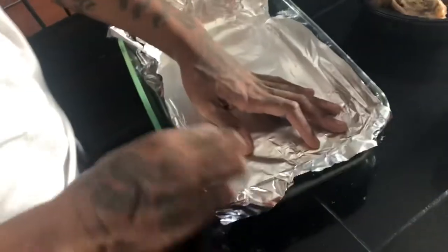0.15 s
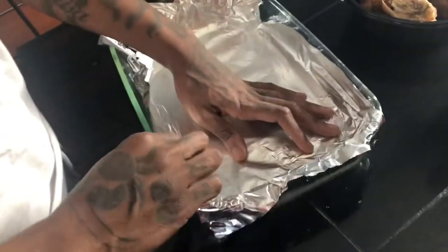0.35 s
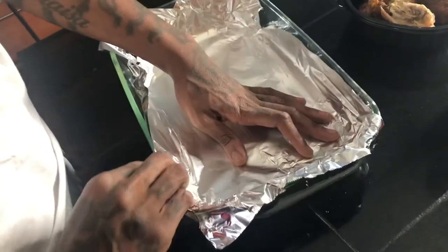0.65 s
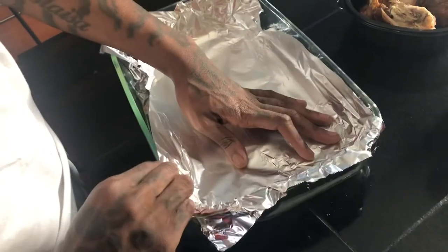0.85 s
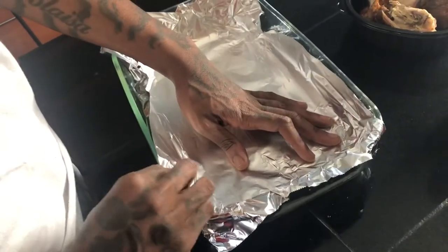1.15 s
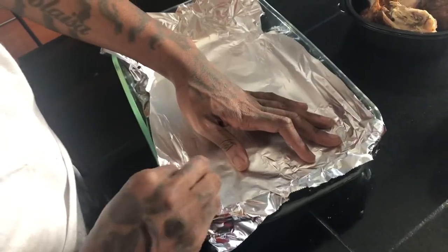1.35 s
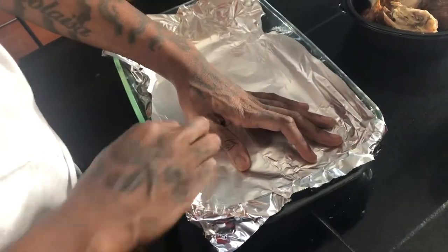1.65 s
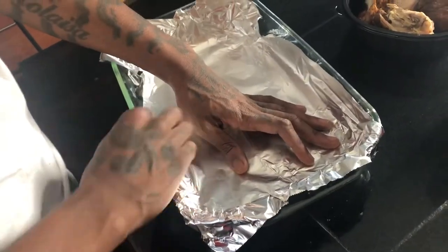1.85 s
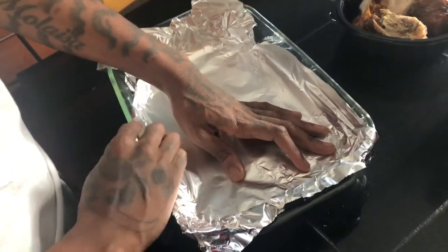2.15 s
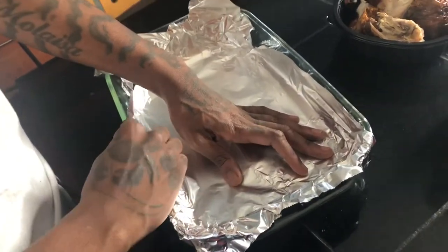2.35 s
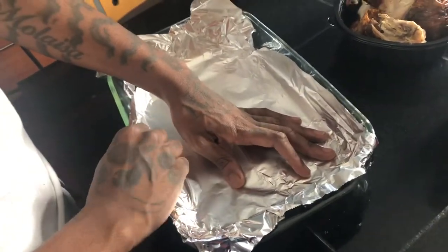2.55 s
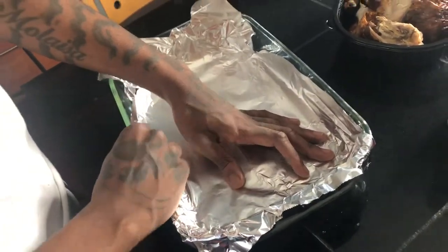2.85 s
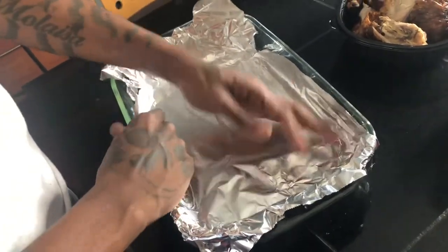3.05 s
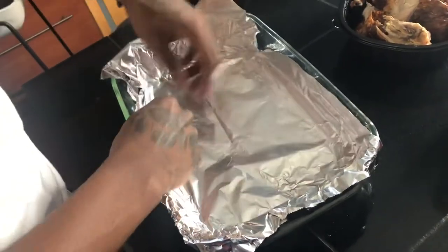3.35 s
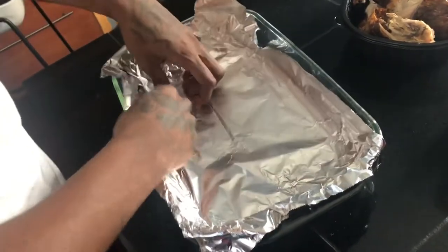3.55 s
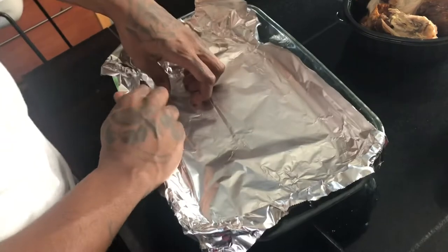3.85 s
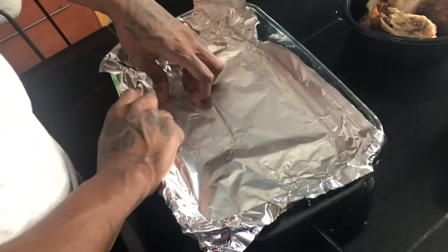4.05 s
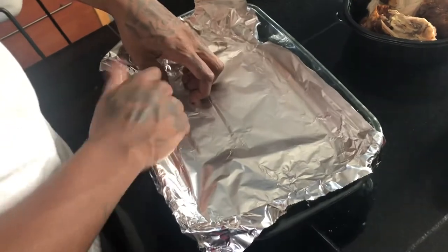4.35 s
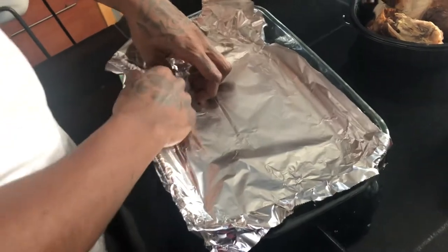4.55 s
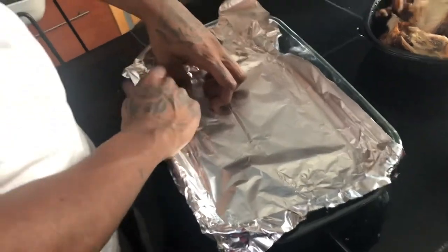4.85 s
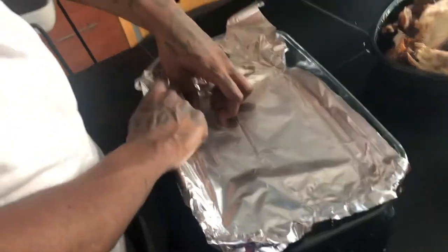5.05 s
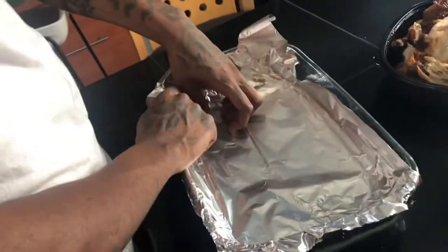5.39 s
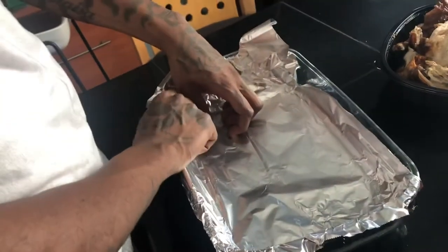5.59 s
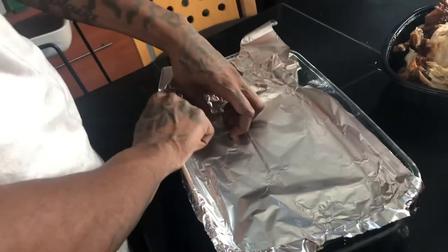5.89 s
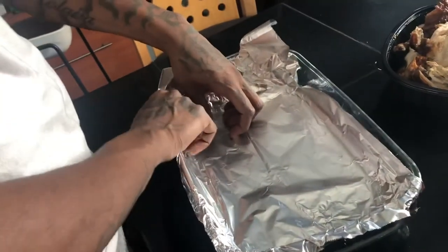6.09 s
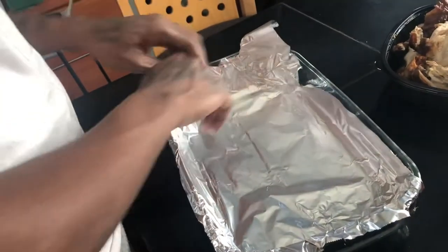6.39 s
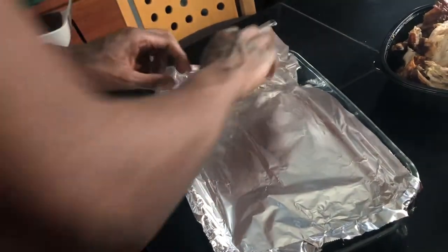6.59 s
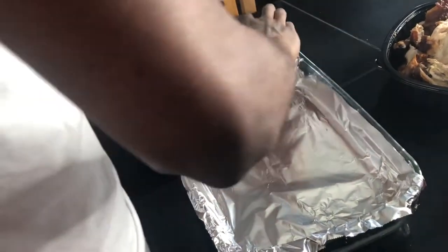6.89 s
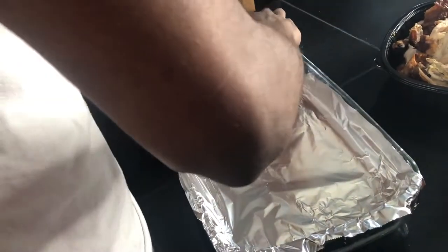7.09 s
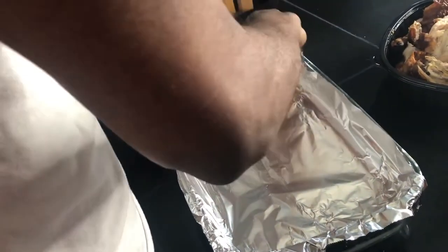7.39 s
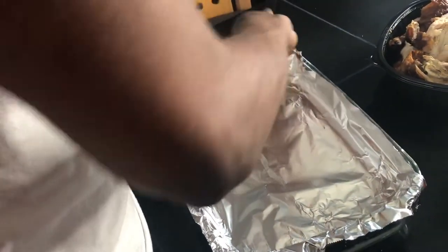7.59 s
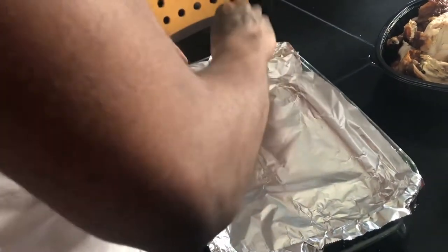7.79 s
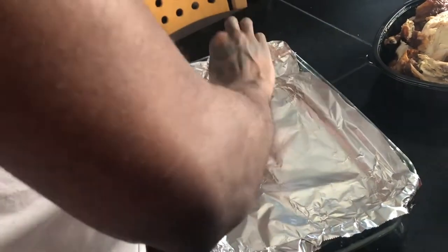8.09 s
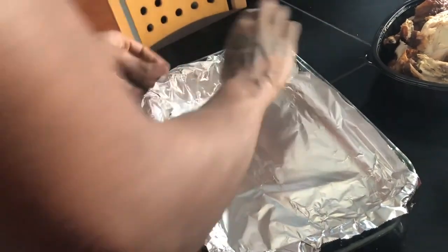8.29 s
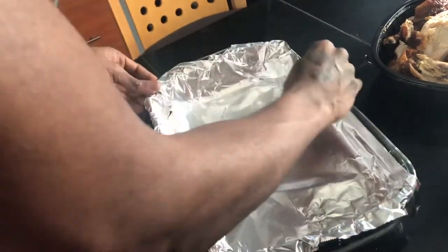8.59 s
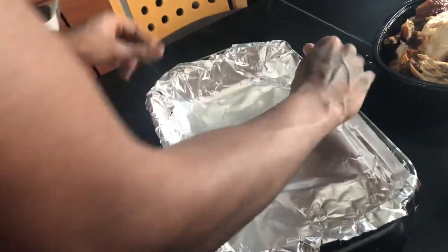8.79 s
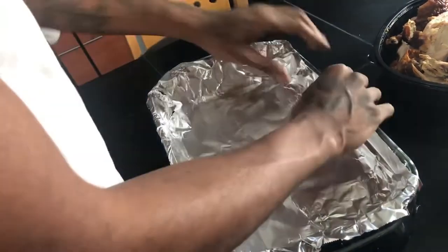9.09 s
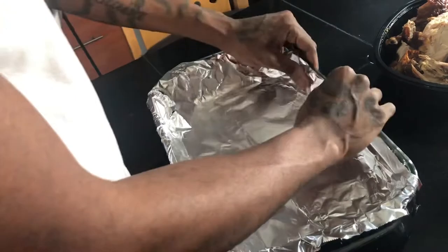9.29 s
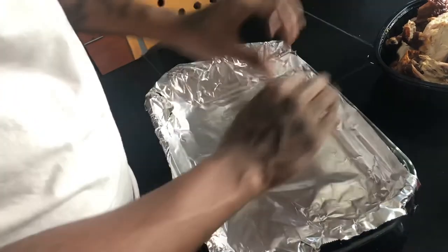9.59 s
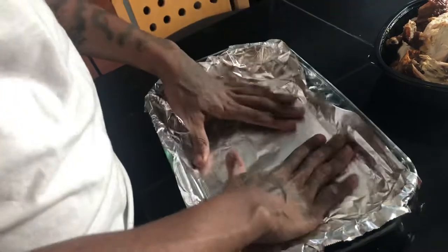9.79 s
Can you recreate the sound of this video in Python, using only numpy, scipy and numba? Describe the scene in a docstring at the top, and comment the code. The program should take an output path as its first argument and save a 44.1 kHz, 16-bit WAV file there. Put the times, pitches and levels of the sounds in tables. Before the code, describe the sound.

Aluminum foil crackles and crinkles close up as it is pressed into a glass dish, with sharp snaps, faint knocks and a quiet kitchen hum.

```python
"""Foil over a baking dish

Close on a phone at a kitchen counter: hands press and crimp aluminium foil into a glass dish.
Noise bursts make the creases, single snaps and dense showers, coloured by the dish's resonances.
The dish knocks the counter as decaying sines; foil squeaks on its rim as gliding tones.
Feedback delays echo these in the kitchen; behind lie noise rumble, a low hum of wavering sines,
and a motor of sines and growling noise that pulls in short turns."""
import sys
import numpy as np
from scipy import signal
from scipy.fft import rfft, irfft, next_fast_len
from scipy.io import wavfile
from scipy.ndimage import uniform_filter1d
from numba import njit

SR = 44100
rng = np.random.default_rng(int(sys.argv[2]) if len(sys.argv) > 2 else 0)


def int16_out(signal):
    """Quantize to a 16-bit WAV file."""
    q = np.round(np.clip(np.atleast_2d(signal).T, -1, 1) * 32767)
    wavfile.write(sys.argv[1], SR, q.astype(np.int16))


N = 438354

# Levels in the tables stand ahead of the phone's rounding and top cut.
# Room rumble, relative colour: (frequency [Hz], density [dB per Hz])
RUMBLE_COLOUR = [(22, -25.5), (35, 5), (47, -13.5), (78, 4.5), (100, -8.5), (120, -0.5), (145, -3),
                 (175, -1.5), (280, -3), (400, -5), (520, -11), (1000, -16.5), (2000, -29.5), (15000, -42)]
# Low hum lines of the room, about which they waver: (frequency [Hz], level [dB rms])
HUM_LINES = [(35, -72.5), (78, -82.5), (120, -74), (237, -75.5), (360, -71), (420, -77), (614, -75)]
# Foil noise, relative colour: (frequency [Hz], density [dB per Hz])
FOIL_COLOUR = [(240, -35), (400, -6.5), (708, -8.5), (1250, -5), (1710, -6.5), (1990, -7), (2550, -1.5),
               (3470, 4.5), (6150, 4), (14800, -0.5), (16000, -9.5)]
# Dish resonances heard under the foil: (frequency [Hz], width [Hz], gain [dB])
DISH_RESONANCES = [(1285, 240, -1.5), (1916, 330, 6.5), (2210, 290, -1.5)]
# Fingers press the sheet: (start [s], swell [s], hold [s], level [dB],
# sheen relative to it [dB], dish and sheet body relative to it [dB])
PRESSES = [(0.0, 0.0033, 0.47, -54, -6, -7.5), (0.193, .11, 0.19, -38, 1, -10),
           (0.516, 0.028, .01, -41, -4, -13), (0.605, .01, .2, -50.5, -3, -4.5),
           (0.78, 0.017, .01, -49.5, 1, -4), (0.9, .005, 0.065, -61, -2, -8),
           (0.997, 0.021, 0.045, -36.5, 3.5, -10.5), (1.16, 0.029, 0.088, -58.5, -3, -5.5),
           (1.306, 0.039, 0.0078, -51.5, -5, -5), (1.39, .005, 0.17, -51.5, -5, -10),
           (1.504, 0.023, 0.013, -45, -1, -9), (1.584, 0.012, .1, -61, 1.5, -3),
           (1.766, 0.039, 0.19, -42, -1, -7.5), (1.942, 0.038, 0.0063, -36, 3, -15),
           (2.05, 0.011, 0.69, -56.5, -3, -7), (2.097, 0.015, .01, -42.5, 6.5, -4),
           (2.173, 0.026, 0.1, -48.5, -6, -5), (2.392, 0.027, .03, -49, -2, 2),
           (2.315, .006, .005, -50.5, 4, -7.5), (2.43, .01, .005, -55, -2, -3),
           (2.458, 0.042, 0.008, -38, 4, -7), (2.672, .005, .015, -52, 0, -7.5),
           (2.776, .005, .02, -58.5, -6.5, -2.5), (2.68, 0.015, 0.015, -53, -6, -1.5),
           (2.826, 0.051, 0.11, -32, 4, -11.5), (3.355, 0.012, 0.045, -29.5, 7, -8),
           (3.451, 0.037, 0.055, -33, 4.5, -7), (3.548, .01, 0.053, -42, 2.5, -10),
           (3.619, 0.099, 0.037, -38, 3.5, -8), (3.884, 0.009, 0.089, -48.5, -3, -5),
           (3.955, 0.068, 0.0067, -35.5, 3, -5), (4.092, 0.1, 0.017, -42, 4, -7.5),
           (4.349, .15, 0.029, -37.5, 3.5, -7), (4.64, 0.061, 0.013, -39, -1, -8),
           (4.761, .1, 0.013, -34.5, 4, -6.5), (4.91, .01, 0.027, -46.5, -3, -8),
           (5.011, 0.065, .01, -41, -2, -8.5), (5.235, 0.1, 0.059, -39.5, -2, -5.5),
           (5.42, 0.014, .005, -46, -1, -10), (5.567, 0.0097, .005, -50.5, -4, -4.5),
           (5.503, .02, 0.089, -66, -6, -5), (5.73, 0.048, 0.09, -40, -3.5, -5),
           (5.9, .02, 0.055, -55, -4, -12), (6.036, 0.062, 0.0078, -35, 1.5, -9.5),
           (6.135, .01, 0.038, -41.5, -1, -7), (6.576, .005, 0.055, -45.5, 1, -1.5),
           (6.597, 0.065, 0.068, -38, -1, -4), (6.774, 0.016, 0.21, -45, -5, -6),
           (7.037, 0.14, .01, -40.5, -6, -6), (7.236, 0.033, .005, -37, -2, -5.5),
           (7.307, .01, 0.12, -45.5, -6, -5.5), (7.464, 0.13, 0.0059, -39, -6.5, -8),
           (7.753, 0.034, 0.062, -40.5, -4.5, -9.5), (7.86, 0.013, 0.18, -52, -3, -2),
           (8.012, 0.14, .02, -42, -3, -10.5), (8.213, 0.021, 0.01, -41, 1.5, -11.5),
           (8.412, 0.011, 0.025, -36.5, -2.5, -9), (8.452, 0.038, 0.019, -34, 5.5, -9.5),
           (8.576, .02, 0.067, -45.5, 0, -9.5), (8.637, 0.087, 0.0075, -41, 1, -9),
           (9.117, 0.01, 0.062, -35.5, 4, -7), (9.274, 0.16, 0.017, -34, 3, -10.5),
           (9.595, 0.0043, 0.0089, -53, -10, -15), (9.668, 0.015, 0.044, -25.5, 8, -12.5),
           (9.686, 0.031, 0.032, -26, 7.5, -10), (9.831, 0.11, .02, -33, 9.5, -9)]
# Single creases: (time [s], nominal peak [dB], facet ring [Hz], sheen rms relative to peak [dB],
# body rms relative to peak [dB], body ring [Hz], t60 [s], ringing share [0-1])
SNAPS = [(0.0374, -31.5, 5670, -4, -24, 2150, 0.037, 0), (0.0608, -31, 6360, -8, -20, 2360, 0.042, 0),
         (0.1168, -35, 5720, -5, -32, 2290, 0.08, 0.25), (0.185, -35, 6610, -4.5, -32, 2400, 0.06, 0.25),
         (0.2402, -34, 4840, -5, -11.5, 2340, 0.06, 0.1), (0.2893, -34, 4380, -11, -25, 2500, 0.054, 0.25),
         (0.3441, -19.5, 5400, -3.5, -21, 2420, 0.081, 0.06),
         (0.4011, -22, 3580, -4, -22, 2500, 0.065, 0.2), (0.401, -21, 4540, -8, -28, 2210, 0.06, 0.25),
         (0.4405, -30, 6930, -10, -31, 2180, 0.053, 0.25), (0.4529, -17, 6350, -5, -25, 1810, 0.13, 0.25),
         (0.5255, -13.5, 6000, -14, -36, 2400, 0.06, 0.25), (0.556, -20.5, 5270, -8, -25, 1850, 0.06, 0.4),
         (0.6309, -17.5, 4020, -10.5, -26, 1840, 0.068, 0.2),
         (0.6733, -28.5, 4900, -16, -16, 1180, 0.039, 0.5), (0.764, -32, 3500, -13, -20, 2020, 0.044, 0.25),
         (0.794, -25, 6080, -13, -21, 2300, 0.065, 0), (0.8169, -22, 5580, -12, -21.5, 1710, 0.063, 0),
         (0.8833, -37.5, 6400, -4.5, -31, 2500, 0.089, 0.4),
         (0.9667, -33.5, 3520, -18, -7, 1970, 0.11, 0.12), (1.0083, -25.5, 3980, -12, -24, 2390, 0.06, 0.2),
         (1.0203, -19.5, 6540, -7.5, -25, 2290, 0.11, 0.1), (1.396, -24, 2930, -18, -15, 2490, 0.06, 0.2),
         (1.443, -18.5, 4010, -7, -24, 1920, 0.06, 0.2), (1.482, -31, 4820, -12, -19, 2480, 0.06, 0.25),
         (1.5178, -26, 2800, -8, -17, 1650, 0.048, 0), (1.5188, -16.5, 4290, -22, -17.5, 2300, 0.06, 0.12),
         (1.786, -40, 5010, -10, -7, 1870, 0.06, 0.25), (1.7955, -30, 4390, -14, -14, 2090, 0.055, 0.2),
         (1.8, -21.5, 6870, -5, -18, 2360, 0.18, 0), (1.873, -25, 6290, -7, -33, 1830, 0.06, 0.5),
         (1.8876, -21, 4170, -6, -23, 1840, 0.06, 0.25), (1.9155, -26.5, 5790, -11, -24, 1710, 0.041, 0.25),
         (1.9453, -18.5, 6970, -7, -22.5, 1840, 0.12, 0),
         (1.9991, -17.5, 6700, -4.5, -22, 1760, 0.082, 0.1),
         (2.1187, -19, 5100, -7.5, -31, 2500, 0.088, 0.35),
         (2.1408, -26.5, 3530, -1, -24, 1210, 0.037, 0.25),
         (2.2222, -24.5, 4860, -9, -21, 1900, 0.075, 0.3),
         (2.2857, -22.5, 6310, -8.5, -18.5, 2440, 0.063, 0.4),
         (2.365, -38, 7000, -7, -18, 964, 0.039, 0.25), (2.381, -21.5, 2920, -23, -22, 2520, 0.053, 0.6),
         (2.4108, -29, 5740, -10, -8, 1270, 0.077, 0.6), (2.4666, -28.5, 5100, -11, -21, 1820, 0.036, 0.25),
         (2.4904, -22, 5060, -11, -24, 2330, 0.12, 0), (2.5381, -23, 3450, -6.5, -22, 2200, 0.028, 0),
         (2.5815, -21.5, 5200, -17, -27, 2310, 0.033, 0.7),
         (2.617, -21.5, 5200, -14, -23.5, 2250, 0.031, 0.15),
         (2.7055, -21.5, 4170, -12, -27, 1360, 0.075, 0.2),
         (2.818, -32.5, 5890, -8.5, -21, 2500, 0.06, 0.25), (2.837, -27.5, 3520, -7, -18, 1520, 0.065, 0.5),
         (2.8629, -19, 5730, -7, -28, 1860, 0.13, 0.25), (2.9267, -21, 5390, -10, -31, 2160, 0.06, 0.25),
         (2.9392, -17, 6080, -6, -27, 2250, 0.06, 0.25), (3.006, -23, 3930, -6, -26, 2320, 0.06, 0),
         (3.365, -16, 5190, -10, -27.5, 2040, 0.06, 0.4), (3.3725, -12.5, 7000, -3.5, -28, 2300, 0.07, 0.5),
         (3.465, -19.5, 3470, -7, -21, 2200, 0.077, 0.25), (3.5117, -14, 6840, -16, -23, 2020, 0.047, 0.4),
         (3.6301, -22, 6900, -5, -18.5, 1920, 0.06, 0.3), (3.6561, -22, 6790, -21, -34, 1700, 0.051, 0.25),
         (3.6748, -27, 5050, -6, -20.5, 1710, 0.06, 0.25), (3.693, -22, 6020, -9, -24, 1910, 0.06, 0.07),
         (3.7958, -25, 5650, -7, -22.5, 1940, 0.06, 0.3), (3.832, -31, 6520, -11, -19, 1270, 0.043, 0.4),
         (3.857, -29.5, 6840, -9, -18.5, 1930, 0.06, 0.2), (3.912, -28, 5350, -10, -21, 2300, 0.06, 0.1),
         (3.9175, -27, 5110, -15, -24, 1840, 0.066, 0.1),
         (3.9517, -26.5, 3370, -11.5, -24, 1910, 0.11, 0.03),
         (4.0136, -15.5, 6140, -12, -27, 2190, 0.048, 0.3), (4.0226, -16, 4230, -9, -32, 1910, 0.06, 0.25),
         (4.0304, -15.5, 7000, -8, -20, 1340, 0.087, 0.4), (4.1074, -28.5, 7000, -11, -22, 851, 0.096, 0.3),
         (4.1572, -24.5, 6140, -7, -28, 2030, 0.052, 0.25), (4.2013, -30, 6150, -7, -27, 2210, 0.082, 0.25),
         (4.2772, -32, 3340, -18, -18.5, 2120, 0.093, 0.2), (4.372, -32, 6020, -11, -21, 2130, 0.039, 0.1),
         (4.4306, -25, 6300, -7, -29, 2500, 0.05, 0.4), (4.4498, -19.5, 5980, -9, -26, 2100, 0.17, 0.25),
         (4.5037, -15, 6360, -4.5, -19, 1280, 0.076, 0.2), (4.536, -23, 5660, -18, -16, 2030, 0.036, 0.25),
         (4.5805, -25, 5530, -5, -18.5, 2250, 0.065, 0.25), (4.592, -20, 4990, -10, -23, 2050, 0.1, 0.1),
         (4.6548, -19.5, 6090, -11, -26.5, 2060, 0.043, 0.5),
         (4.6813, -18.5, 6950, -11.5, -30, 1340, 0.06, 0.1),
         (4.6946, -21.5, 5880, -8, -24, 1830, 0.094, 0.25), (4.763, -27.5, 4370, -9, -28, 2230, 0.06, 0.25),
         (4.7792, -21.5, 3550, -8, -20, 2200, 0.092, 0.2),
         (4.8045, -19, 5630, -10, -12.5, 2040, 0.058, 0.3), (4.84, -25, 6410, -11, -17, 2030, 0.06, 0.2),
         (4.8518, -8.5, 5460, -10.5, -19, 2040, 0.085, 0.07),
         (4.9257, -27, 5590, -9, -22, 2080, 0.049, 0.25), (4.9396, -19, 3060, -8.5, -21, 1400, 0.047, 0.2),
         (5.018, -25.5, 4220, -13, -34, 1840, 0.041, 0.6), (5.0618, -22, 4110, -9, -25, 2100, 0.065, 0.25),
         (5.0932, -21.5, 6360, -10, -16.5, 1170, 0.06, 0.1),
         (5.1876, -33, 5190, -21, -22, 2500, 0.091, 0.25), (5.25, -32.5, 4240, -9, -19, 2180, 0.076, 0.25),
         (5.3238, -21, 3690, -11, -8.5, 1970, 0.049, 0.97),
         (5.3316, -19, 6960, -11.5, -27, 1160, 0.045, 0.25),
         (5.353, -15, 5720, -10.5, -20, 2190, 0.047, 0.4),
         (5.4897, -26.5, 5690, -16, -14.5, 2140, 0.04, 0.75),
         (5.5588, -35, 3400, -15, -17, 2080, 0.095, 0.25), (5.659, -31, 4200, -29, -30, 2080, 0.06, 0.1),
         (5.7024, -33.5, 4300, -21, -30, 877, 0.06, 0.25), (5.7234, -38.5, 5700, -6, -25, 2230, 0.05, 0.3),
         (5.7517, -35, 6500, -16.5, -15, 1040, 0.06, 0.25),
         (5.7663, -23, 3600, -16, -14, 1050, 0.075, 0.17), (5.774, -21.5, 3700, -14, -16, 1920, 0.1, 0.1),
         (5.8513, -27, 4170, -21, -9, 2030, 0.06, 0.25), (5.8738, -25.5, 4300, -8.5, -11, 1900, 0.06, 0.5),
         (5.9794, -22.5, 4270, -12.5, -17.5, 1340, 0.079, 0.4),
         (6.0368, -24.5, 5200, -17, -16.5, 2130, 0.051, 0.45),
         (6.0661, -37, 5600, -17, -24, 2040, 0.049, 0.25), (6.0834, -17, 5040, -9, -21, 2100, 0.085, 0.03),
         (6.1085, -15.5, 5000, -2.5, -20.5, 2210, 0.073, 0.13),
         (6.1644, -28.5, 5950, -1.5, -21, 2200, 0.097, 0.25),
         (6.352, -39.5, 6530, -23, -30.5, 1010, 0.036, 0), (6.576, -38, 3180, -11, -14, 1890, 0.053, 0.25),
         (6.5959, -29, 3010, -13, -13, 864, 0.067, 0.3), (6.6363, -24.5, 3100, -12, -15, 1680, 0.065, 0.2),
         (6.6692, -19.5, 3980, -6.5, -17, 2010, 0.13, 0.1), (6.6984, -20, 2890, -7, -15, 1240, 0.049, 0.6),
         (6.7367, -21, 4130, -8, -21, 1670, 0.06, 0.25), (6.764, -18.5, 3680, -7.5, -38, 2170, 0.099, 0.25),
         (6.8587, -28.5, 3840, -14, -17, 1940, 0.14, 0.4),
         (6.8825, -26.5, 5820, -11, -12.5, 1710, 0.07, 0.2),
         (6.9084, -25.5, 5950, -12, -8.5, 1810, 0.086, 0.5),
         (6.9294, -24.5, 5610, -7, -12.5, 2010, 0.05, 0.05),
         (6.9985, -37, 6470, -14, -19, 1710, 0.066, 0.1), (6.999, -21, 5660, -19, -20.5, 2440, 0.044, 0.46),
         (7.0806, -24, 5750, -16, -20, 2070, 0.049, 0.14), (7.1257, -25, 6860, -13.5, -20, 1900, 0.027, 0),
         (7.1924, -26, 4720, -8, -28, 2490, 0.046, 0.3), (7.2424, -24.5, 5790, -11, -19, 2160, 0.081, 0),
         (7.3387, -24.5, 4910, -23, -12, 2500, 0.041, 0.6),
         (7.3492, -21, 6430, -13, -17, 1850, 0.065, 0.15),
         (7.392, -18.5, 2800, -20, -19.5, 2380, 0.065, 0.84),
         (7.4128, -18, 3260, -19, -28, 2040, 0.046, 0.3),
         (7.4242, -18, 6500, -15, -22.5, 2480, 0.048, 0.07), (7.546, -25.5, 3910, -16, -18, 2340, 0.053, 0),
         (7.7586, -47, 5910, -12, -9, 1740, 0.068, 0.25), (7.7842, -26.5, 5660, -8.5, -18, 2230, 0.11, 0.1),
         (7.9443, -20, 5160, -15, -24, 2174, 0.04, 0.34),
         (8.0586, -13, 5200, -18, -24.5, 2200, 0.033, 0.54),
         (8.086, -22.5, 4840, -31, -36, 2170, 0.066, 0.6),
         (8.1504, -25, 5630, -9.5, -23, 2300, 0.075, 0.25), (8.233, -24, 4440, -17, -22.5, 2200, 0.15, 0.3),
         (8.418, -29, 4690, -16, -23, 2500, 0.06, 0.25), (8.4619, -20, 4480, -11, -26, 1850, 0.054, 0.4),
         (8.4814, -18, 4990, -10, -28, 2370, 0.076, 0.4), (8.5965, -31, 4170, -18, -19, 2080, 0.06, 0.1),
         (8.6092, -24, 4200, -8, -22, 2240, 0.06, 0.25), (8.6936, -29, 7000, -8, -32, 2260, 0.06, 0.25),
         (8.694, -25, 4660, -8, -34, 2220, 0.06, 0.4), (8.7083, -22, 4760, -11, -37, 1830, 0.06, 0.8),
         (8.739, -18, 5140, -8.5, -25.5, 2140, 0.088, 0.03),
         (9.1299, -19, 4300, -10.5, -15, 2490, 0.05, 0.01), (9.2685, -25, 5270, -10, -23, 2040, 0.075, 0),
         (9.2852, -20, 4440, -13, -16, 1240, 0.038, 0.25), (9.3197, -21.5, 4100, -10, -26, 1100, 0.051, 0),
         (9.3621, -32, 4650, -18, -15, 851, 0.05, 0.25), (9.3806, -26.5, 5550, 1, -24, 2420, 0.071, 0.25),
         (9.412, -18.5, 6270, -5.5, -23.5, 2290, 0.18, 0.3),
         (9.5457, -31, 5340, -9, -26, 1880, 0.085, 0.25), (9.6035, -31.5, 6560, -14, -35, 2450, 0.1, 0.6),
         (9.6759, -15, 5946, -8, -29, 2500, 0.065, 0.5), (9.6877, -11, 4810, -17, -28, 2450, 0.069, 0.5),
         (9.869, -27.5, 5120, -3, -25, 1790, 0.065, 0.25), (9.8945, -25, 5240, -4, -23, 2090, 0.045, 0.25),
         (9.9112, -23, 4010, -2, -26, 2050, 0.077, 0)]
# When the motor pulls: (start [s], end [s], strength [dB])
MOTOR_TURNS = [(1.454, 2.35, -0.5), (4.8, 5.75, 0.5), (8.098, 9.095, -0.5)]
# Motor lines at 0 dB strength, about which they waver: (frequency [Hz], level [dB rms])
MOTOR_LINES = [(120, -72), (240, -73), (301, -69), (345, -73), (362, -73), (420, -71)]
# Dish on the counter: (time [s], peak [dB], ring length [factor on t60], brightness [dB per octave])
KNOCKS = [(1.519, -36, 0.6, 0.5), (3.398, -33.5, 0.9, 1), (4.059, -18, 0.74, 1.5), (4.849, -29, 0.4, 8),
          (6.596, -25.5, 0.09, 8.5), (6.654, -32.5, 0.9, 1), (6.699, -19.5, 0.03, 12),
          (6.728, -28, 0.08, 9), (8.442, -35, 0.4, 8), (9.131, -47, 0.4, 6), (9.286, -34, 0.8, 1),
          (9.731, -35.5, 0.5, -0.5)]
# Modes of dish and counter: (frequency [Hz], relative level [dB], t60 at ring length 1 [s])
COUNTER_MODES = [(169.6, -8, 0.72), (182, -12.5, 0.96), (290, -5, .2), (372, -2, 0.22), (470, 3.5, 0.065),
                 (536.5, -4.5, 0.34), (694, -3.5, 0.11), (782, -9.5, 0.16), (898, 3.5, 0.08),
                 (1226, -1.5, 0.048), (1496, -1.5, 0.052), (1840, -17, 0.027)]
# A tight flap of foil on the rim: (start [s], end [s], pitch [Hz], end pitch [Hz], level [dB rms])
SQUEAKS = [(2.2, 2.234, 1197, 1150, -50), (2.355, 2.41, 980, 1030, -62), (5.31, 5.372, 1133, 1180, -47),
           (7.29, 7.361, 870, 930, -51.5), (9.31, 9.397, 860, 873, -50.5)]

RUMBLE_DB = -57.5
SWELL_DB, RELEASE_DB_PER_S = 14, 227.5  # a press swells by this much, then dies away
SHEEN_PER_DB, BODY_PER_DB = 0.6, -0.2  # extra loss per dB below full strength: duller, more body
REST_DB = -89  # the sheet left alone
FACET_Q = 11.0  # sharpness of a facet's ring
GRAIN_T60_S = 0.02  # middle length of the small creases
FEWEST = 0.2  # least share of the small creases that sound
CREST_DB = 13  # peak of a crease over its rms
HARD_T60_S = 0.06  # creases shorter than this start with a harder crack
ROOM_T60_S, ROOM_DAMP, ROOM_DB = 0.58, 0.47, -19.5  # t60 before damping, damping [0-1], gain
TOP_HZ = 15900


def undb(db):
    """Decibels to an amplitude factor."""
    return 10 ** (np.asarray(db) / 20)


def level(x, db):
    """Sets the rms of a signal in dB."""
    return x * undb(db) / np.sqrt(np.mean(x ** 2))


def noise(spectrum, lo_hz=1, hi_hz=22000):
    """Noise of a (Hz, dB) colour between two edges, rms 1."""
    n = next_fast_len(N, True)
    f = np.arange(1, n // 2 + 2) * SR / n
    hz, db = np.transpose(spectrum)
    colour = undb(np.interp(np.log(f), np.log(hz), db))
    edges = np.sqrt((1 + (lo_hz / f) ** 8) * (1 + (f / hi_hz) ** 8))
    return level(irfft(rfft(rng.standard_normal(n)) * colour / edges, n)[:N], 0)


def ring(x, hz, width):
    """One resonance, gain 1 at its centre."""
    return signal.lfilter(*signal.iirpeak(hz, hz / width, fs=SR), x)


def walk(rate):
    """Random levels held 1 / rate s and slewed twice; spread near 1."""
    k = int(SR / rate)
    steps = np.repeat(rng.standard_normal(N // k + 1), k)
    return 1.45 * uniform_filter1d(uniform_filter1d(steps, k), k)[:N]


def tones(lines, waver_db, drift):
    """Sine lines whose strength [dB] and phase [cycles] waver by about the given spreads."""
    t = np.arange(N) / SR
    out = np.zeros(N)
    for hz, db in lines:
        strength = np.sqrt(2) * undb(db + waver_db * walk(15))
        cycles = hz * t + rng.random() + drift * walk(12)
        out += strength * np.sin(2 * np.pi * cycles)
    return out


def rumble():
    """Room rumble: coloured noise whose level wanders slowly."""
    return level(noise(RUMBLE_COLOUR), RUMBLE_DB) * undb(1.0 * walk(3.17))


def hum():
    """Room hum: low lines with a slight waver."""
    return tones(HUM_LINES, waver_db=1.0, drift=0.05)


def foil_bands():
    """Body (coloured by the dish), middle and sheen of the sheet's sound, each at rms 1."""
    body = noise(FOIL_COLOUR, hi_hz=2690)
    dish = sum(undb(db) * ring(body, hz, width) for hz, width, db in DISH_RESONANCES)
    middle = noise(FOIL_COLOUR, lo_hz=2410, hi_hz=7630)
    sheen = noise(FOIL_COLOUR, lo_hz=7460)
    return np.array([level(1.48 * body + dish, 0), middle, sheen])


def pressure(t):
    """Level, sheen and body of the crumpling at times t: each press swells, holds and dies away."""
    power = np.ones((3, len(t))) * undb(2 * REST_DB)
    loss_rate = np.array([[1], [1 + SHEEN_PER_DB], [1 + BODY_PER_DB]])
    for start, swell, hold, db, sheen_db, body_db in PRESSES:
        since = t - start
        swelling = SWELL_DB * (1 - since / swell)
        dying = RELEASE_DB_PER_S * (since - swell - hold)
        under = np.maximum(swelling, dying).clip(0, 90)  # dB below full strength
        tilt = np.array([[0], [sheen_db], [body_db]]) - under * loss_rate
        power += (since > 0) * undb(2 * (db + tilt))  # doubled dB: powers add
    db = 10 * np.log10(power)
    return db[0], db[1] - db[0], db[2] - db[0]


@njit
def bursts(at, gain, t60, hz, tone, place, bands, sharp, rise, crack, quick):
    """Each crease: a crack and a slower fall of body, middle and sheen noise; body and middle ring a facet."""
    n = bands.shape[1]
    out = np.zeros(n)
    for e in range(len(at)):
        fall = np.exp(-np.log(1000) / (t60[e] * SR))
        first = int(at[e] * SR)
        last = min(n, int((at[e] + 0.7 * t60[e]) * SR))
        for band in range(3):
            share = tone[e] if band < 2 else 0.0
            dry_gain, ring_gain = np.sqrt(1 - share), np.sqrt(share * sharp)
            # state-variable band-pass: tuning g, damping k, states b and l
            g, k, b, l = np.tan(np.pi * hz[e, min(band, 1)] / SR), 1 / sharp, 0.0, 0.0
            env, fast, up = gain[e, band], crack[e], 1.0
            j = int(place[e] * n)  # where in the noise this crease reads
            for i in range(first, last):
                env, fast, up = env * fall, fast * quick, up * rise
                j = (j + 1) % n
                x = env * (1 + fast) * (1 - up) * bands[band, j]
                v = (b + g * (x - l)) / (1 + g * (g + k))
                b, l = 2 * v - b, l + 2 * g * v
                out[i] += dry_gain * x + ring_gain * k * v
    return out


def creases(at, db, hz, sheen_db, body_db, body_hz, t60, tone, place, bands, crack):
    """Plays rows of creases: a buckling facet rises in a fraction of a millisecond and rings off."""
    gain = undb(np.array([db + body_db, db, db + sheen_db]).T)
    ring_hz = np.array([body_hz, hz]).T
    rise, quick = np.exp(-1 / (0.0002 * SR)), np.exp(-1 / (0.0015 * SR))  # 0.2 ms attack, 1.5 ms crack
    return bursts(at, gain, t60, ring_hz, tone, place, bands, FACET_Q, rise, crack + 0 * at, quick)


def crumple(bands, per_s=2200, full_db=-25, loosest_spread_db=3.5, colour_db=1.5):
    """A shower of small creases, many faint and a few strong, each with its own colour."""
    count = int(per_s * N / SR)
    at = rng.random(count) * N / SR
    db, sheen_db, body_db = pressure(at)
    # a harder squeeze folds more and more even creases; a light one leaves gaps
    share = np.clip(undb(0.7 * (db - full_db)), FEWEST, 1)
    spread = loosest_spread_db * (1 - 0.95 * share) * np.log(10) / 10
    size = -spread * np.log(1 - 0.995 * rng.random(count))  # log of power
    t60 = GRAIN_T60_S * 7.2 ** rng.uniform(-1, 1, count)
    # mean power of the shower, so that the press table gives its level
    power = share * per_s * np.mean(t60) / np.log(1e6) / (1 - np.minimum(spread, 0.9))
    db = db + 10 * np.log10(np.exp(size) / power)
    sheen_db = sheen_db + colour_db * rng.uniform(-1, 1, count)
    body_db = body_db + colour_db * rng.uniform(-1, 1, count)
    hz = 2800 * 2.18 ** rng.random(count)
    body_hz = 1000 * 2.3 ** rng.random(count)
    tone = np.full(count, 0.096)
    place = rng.random(count)
    rows = np.array([at, db, hz, sheen_db, body_db, body_hz, t60, tone, place])
    sounding = rng.random(count) < share
    return creases(*rows[:, sounding], bands, crack=0.28)


def snaps(bands):
    """The creases that stand out; the shorter one is, the harder it cracks."""
    at, peak_db, hz, sheen_db, body_db, body_hz, t60, tone = np.transpose(SNAPS)
    crack = 0.5 * (HARD_T60_S / t60) ** 1.67
    # only the middle band steps down from peak to rms; sheen and body are already rms
    return creases(at, peak_db - CREST_DB, hz, sheen_db + CREST_DB, body_db + CREST_DB, body_hz,
                   t60, tone, rng.random(len(SNAPS)), bands, crack)


@njit
def walls(x, lags, gain, damp):
    """Eight delay lines that feed each other, duller on every round."""
    line, soft, out = np.zeros((8, 4096)), np.zeros(8), np.zeros(len(x))
    for i in range(len(x)):
        total = 0.0
        for k in range(8):
            soft[k] += (1 - damp) * (gain[k] * line[k, (i - lags[k]) & 4095] - soft[k])
            total += soft[k]
        out[i] = soft[0] - soft[1] + soft[2] - soft[3] + soft[4] - soft[5]
        for k in range(8):
            line[k, i & 4095] = x[i] + soft[k] - total / 4
    return out


def kitchen_echo(near):
    """The kitchen's reflections of the sounds close to the phone."""
    lags = np.array([433, 587, 761, 919, 1123, 1361, 1597, 1873])  # samples
    gain = undb(-60 * lags / SR / ROOM_T60_S)
    # the tiny offset keeps the fading lines out of very slow arithmetic
    return undb(ROOM_DB) * walls(near + 1e-18, lags, gain, ROOM_DAMP)


def motor():
    """A motor that growls during each turn: wavering lines over a band of noise."""
    t = np.arange(N) / SR
    on = np.zeros(N)
    for start, end, db in MOTOR_TURNS:
        fade_in = np.clip((t - start) / 0.028, 0, 1)
        fade_out = np.clip((end - t) / 0.015, 0, 1)
        on += undb(db) * fade_in * fade_out
    growl = level(ring(rng.standard_normal(N), 327, 170), -59.5)
    return on * (tones(MOTOR_LINES, waver_db=3.5, drift=0.05) + growl)


def knocks(rise_s=0.00075, rattle_db=2.0):
    """The dish meets the counter; their modes swing up out of step and rattle as they fade."""
    out, t, rattle = np.zeros(N + SR), np.arange(SR // 2) / SR, walk(70)
    for at, peak_db, length, bright_db in KNOCKS:
        hit = np.zeros(len(t))
        for k, (hz, mode_db, t60) in enumerate(COUNTER_MODES):
            # each mode reads another stretch of the rattle
            shake = np.minimum(t / 0.022, 1) * np.roll(rattle, int(hz * at * 10))[:len(t)]
            detuned_hz = hz * (1 + 0.009 * rng.standard_normal())
            wander = 1.1 * shake[::-1] * np.minimum(t / 0.029, 1)  # radians
            swing = (-1) ** k * np.sin(2 * np.pi * detuned_hz * t + wander)
            tilt_db = bright_db * np.log2(hz / 500)
            strength = undb(mode_db + tilt_db + 2.0 * rng.standard_normal() + rattle_db * shake)
            hit += strength * swing * 1000.0 ** (-t / (t60 * length))
        hit *= 1 - np.exp(-t / rise_s)
        first = int(at * SR)
        out[first:first + len(t)] += undb(peak_db) * hit / np.abs(hit).max()
    return out[:N]


def squeaks(rough=0.38):
    """Stick-slip tones, unsteady in pitch and strength."""
    out, wobble, flutter = np.zeros(N), walk(140), walk(150)
    for start, end, hz, end_hz, db in SQUEAKS:
        part = slice(int(start * SR), int(end * SR))
        glide = np.linspace(hz, end_hz, part.stop - part.start)
        pitch = glide * (1 + 0.045 * wobble[part])
        shape = signal.windows.tukey(len(pitch), 0.4) * (1 + rough * flutter[part])
        out[part] += np.sqrt(2) * undb(db) * shape * np.sin(2 * np.pi * np.cumsum(pitch) / SR)
    return out


def scene():
    """Foil and dish close by, their echo, and the kitchen behind."""
    bands = foil_bands()
    near = crumple(bands) + snaps(bands) + knocks() + squeaks()
    background = rumble() + hum() + motor()
    return (near + kitchen_echo(near) + background)[None]


def record(dry):
    """The phone rounds the loudest peaks and cuts the top."""
    rounded = np.tanh(1.224 * dry) / 1.37
    top_cut = signal.ellip(10, 0.2, 70, TOP_HZ, fs=SR, output="sos")
    return signal.sosfilt(top_cut, rounded)


dry = scene()
out = record(dry)
int16_out(out)
```